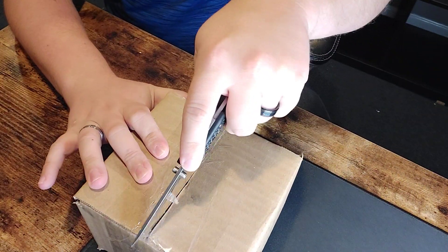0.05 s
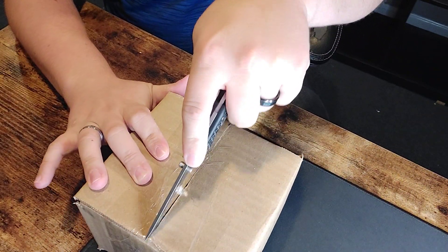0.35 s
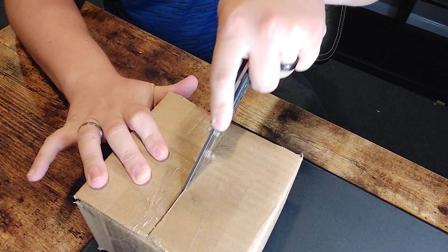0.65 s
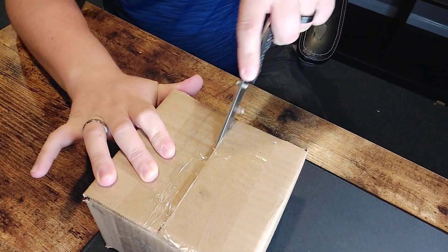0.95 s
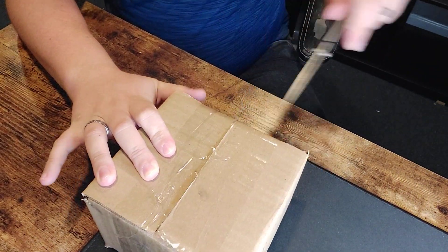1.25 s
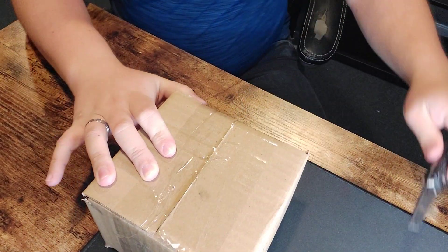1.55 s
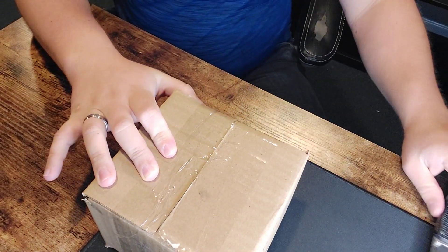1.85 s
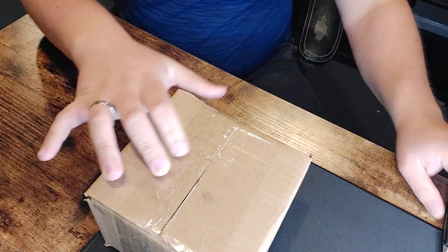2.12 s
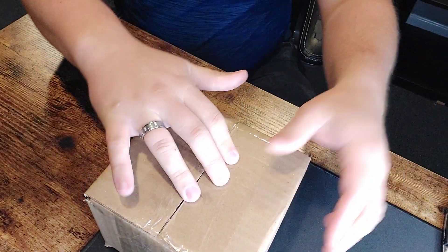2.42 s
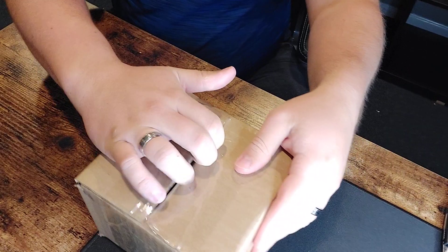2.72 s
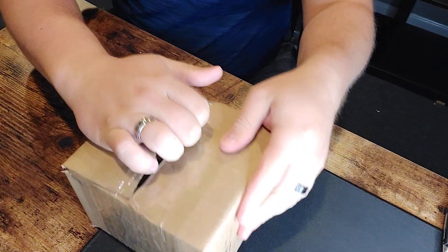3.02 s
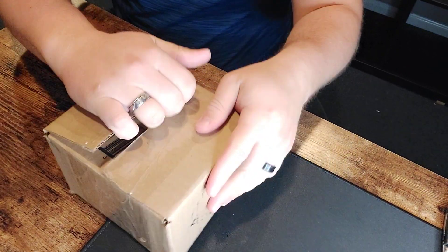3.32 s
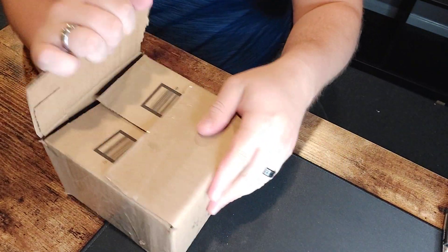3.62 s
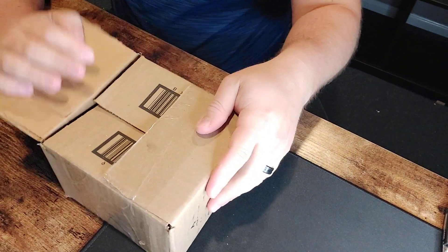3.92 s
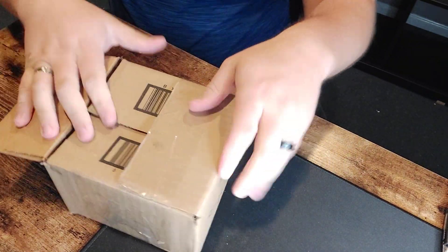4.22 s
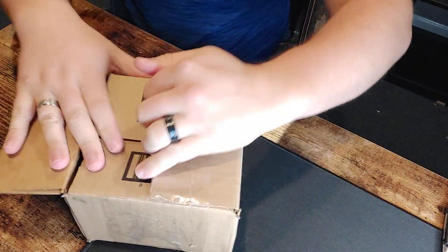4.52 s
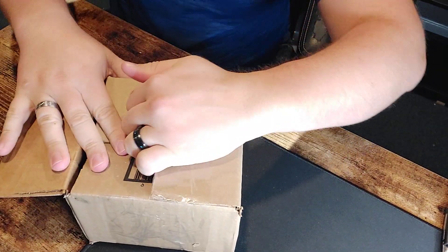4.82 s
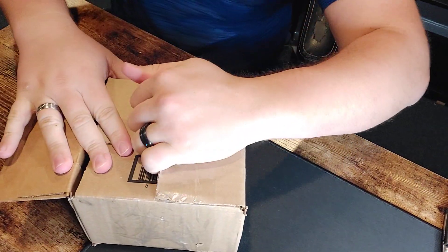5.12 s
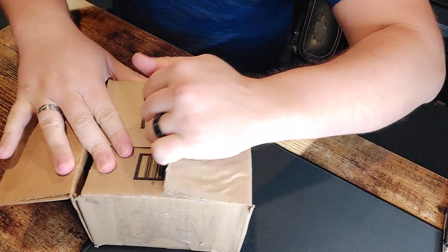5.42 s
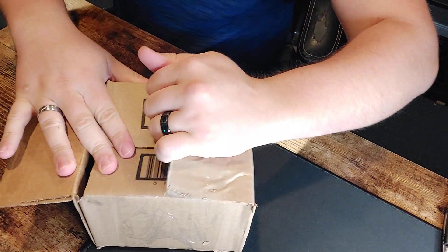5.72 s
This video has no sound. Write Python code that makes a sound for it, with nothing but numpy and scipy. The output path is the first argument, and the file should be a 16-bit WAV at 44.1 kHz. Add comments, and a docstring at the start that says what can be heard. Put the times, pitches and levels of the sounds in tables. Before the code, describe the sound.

Close scratchy slicing of packing tape, a knock on a desk, then cardboard flaps rubbing and popping open in a small room.

```python
"""A small cardboard box is cut open on a desk in a small room, close to a phone.
A knife punctures the packing tape, saws along the seam and is laid down, exciting the desk's modes.
Fingers slide over the lid, the last bits of tape snap, and the flaps scrape as they are pried up.
The scraping is stick-slip friction and the snaps are brief fractures; both set the hollow box ringing.
Short wall reflections and faint room air surround them."""
import sys
import numpy as np
from scipy import signal
from scipy.fft import rfft, irfft
from scipy.io import wavfile
from scipy.ndimage import uniform_filter1d

SR = 44100
rng = np.random.default_rng(int(sys.argv[2]) if len(sys.argv) > 2 else 0)


def materialize(psi):
    """Save the field psi as 16-bit PCM at rate SR to the path in sys.argv[1].

    A 1-D psi becomes a single channel; in a 2-D psi each row is a channel.
    """
    bounded = np.clip(np.atleast_2d(psi).T, -1, 1)
    quanta = np.round(bounded * 32767).astype(np.int16)
    wavfile.write(sys.argv[1], SR, quanta)


N = 262395
TIME = np.arange(N) / SR
RING_TIME = TIME[:SR // 2]


def undb(db):
    """Decibels to amplitude ratio."""
    return 10 ** (np.asarray(db) / 20)


def unit(x):
    """Normalisation to an rms of 1."""
    return x / np.sqrt(np.mean(x ** 2) + 1e-30)


def blow(x):
    """Normalisation of a transient to the energy of 20 ms at full level."""
    return x * np.sqrt(0.02 * SR / np.sum(x ** 2))


def along(points, hz):
    """Interpolation of (frequency, value) points on a log-frequency axis."""
    known_hz, value = np.transpose(points)
    return np.interp(np.log(hz + 1), np.log(known_hz), value)


def colour(x, spectrum, size=2048):
    """Minimum-phase filter: folding the cepstrum makes the (Hz, dB) response causal."""
    cepstrum = irfft(np.log(undb(along(spectrum, np.fft.rfftfreq(size, 1 / SR)))))
    cepstrum[1:size // 2] *= 2
    cepstrum[size // 2 + 1:] = 0
    return signal.fftconvolve(x, irfft(np.exp(rfft(cepstrum))))[:len(x)]


def cut(x, hz, kind, order=2):
    """Maximally flat low-, high- or band-pass filter."""
    return signal.sosfilt(signal.butter(order, hz, kind, fs=SR, output="sos"), x)


def resonate(x, hz, width_hz):
    """Second-order resonance with unit gain at its centre."""
    return signal.lfilter(*signal.iirpeak(hz, hz / width_hz, fs=SR), x)


def fade(t60_s):
    """Exponential decay, 60 dB in t60_s."""
    return np.exp(-np.log(1000) * RING_TIME / t60_s)


def mode(hz, t60_s):
    """Free vibration of one damped mode."""
    return np.sin(2 * np.pi * hz * RING_TIME) * fade(t60_s)


def add(out, start_s, sound):
    """Superposition of a sound from start_s onward."""
    start = int(start_s * SR)
    out[..., start:start + sound.shape[-1]] += sound[..., :N - start]


def diffuse(count):
    """Diffuse field: coherent at the two microphones in the bass, incoherent in the treble."""
    # frequency_hz, coherence
    likeness = [(100, 0.95), (300, 0.84), (600, 0.33), (1200, 0.12), (3000, 0), (12000, 0)]
    coherence = along(likeness, np.fft.rfftfreq(count, 1 / SR))
    mid, side = rfft(rng.standard_normal((2, count))) * np.sqrt([1 + coherence, 1 - coherence])
    return unit(irfft([mid + side, mid - side], count))


def air(level_db=-63.5):
    """Ambient noise: the room's faint, steady diffuse field."""
    # frequency_hz, gain_db
    spectrum = [(30, 7.5), (60, 4), (110, -7.5), (330, -14.5), (480, -4), (660, -11), (850, -22.5),
                (1500, -17.5), (2000, -32.5), (9000, -35.5), (15000, -28.5)]
    return undb(level_db) * unit(np.array([colour(side, spectrum) for side in diffuse(N)]))


def swell(start_s, rise_s, hold_s, fall_s, range_db=26, roundness=1.23):
    """Friction level follows sliding speed: the hand accelerates, holds and slows."""
    early = np.maximum(start_s + rise_s - TIME, 0) / rise_s
    late = np.maximum(TIME - start_s - rise_s - hold_s, 0) / fall_s
    return undb(-range_db * np.minimum(early + late, 4) ** roundness)


def friction(strokes, spectrum, slips_per_s, uneven_db, catch_db):
    """Stick-slip friction: fibres release dense, uneven impulses that shake the surface."""
    size = undb(uneven_db * np.minimum(rng.exponential(size=N), 5))
    slips = rng.standard_normal(N) * size * (rng.random(N) < slips_per_s / SR)
    slips *= undb(catch_db * unit(cut(rng.standard_normal(N), 110, "low")))  # slips come in clusters
    slips /= np.sqrt(uniform_filter1d(slips ** 2, size=1800) + 1e-9)  # steady power over about 40 ms
    surface = colour(slips, spectrum)
    rumble = unit(cut(surface, 250, "low", order=4))
    body = unit(cut(surface, [250, 2500], "band", order=4))
    hiss = unit(cut(surface, 2500, "high", order=4))
    return sum(undb(level_db) * swell(*timing) * (body + undb(hiss_db) * hiss + undb(rumble_db) * rumble)
               for *timing, level_db, hiss_db, rumble_db in strokes)


def blade_sawing():
    """Friction of steel on tape and card: the blade feels for the seam, then saws along it."""
    # start_s, rise_s, hold_s, fall_s, level_db, hiss_db, rumble_db
    strokes = [(0.07, 0.011, 0.047, 0.062, -70.5, -7, -12), (0.165, .015, .08, 0.22, -61.5, -8, -21.5),
               (0.35, 0.0047, 0.0071, 0.027, -51, -5.5, -8.5), (0.36, 0.027, 0.032, 0.028, -64, 1, -10.5),
               (0.436, 0.0089, .002, .005, -36, -4.5, -23), (0.52, 0.048, 0.12, 0.13, -43, -4, -15.5),
               (0.76, 0.01, 0.087, .1, -59, -1.5, -4), (0.82, 0.18, 0.021, 0.073, -36.5, -3, -13.5),
               (1.06, 0.058, 0.051, 0.015, -39, -1, -8), (1.285, 0.012, 0.024, 0.072, -64, 0, -18)]
    # frequency_hz, gain_db
    spectrum = [(60, -16), (140, -1.5), (330, -5.5), (470, 2), (750, -10.5), (1000, -12), (1250, -16.5),
                (1520, -11), (1900, -18.5), (2900, -19), (7500, -23.5), (9500, -28.5), (15000, -23)]
    return friction(strokes, spectrum, slips_per_s=8220, uneven_db=2.5, catch_db=2.0)


def crack(length_s, treble_db):
    """Fracture: a tear crosses tape or fibre in milliseconds and radiates a pitchless pulse."""
    # frequency_hz, gain_db
    spectrum = [(60, -24.5), (150, -15.5), (300, -4), (550, 5.5), (850, -8.5), (1200, -3.5), (1500, 1.5),
                (1950, -8), (2700, -1.5), (3700, -4.5), (6200, -2), (7900, -2), (9700, -5), (14500, -3)]
    envelope = np.exp(-(RING_TIME[:1024] / (2 * length_s)) ** 4)
    tear = rng.standard_normal(len(envelope))
    for _ in range(12):  # flatten the spectrum while keeping the pulse short
        tear = irfft(np.exp(1j * np.angle(rfft(tear * envelope))))
    tear = colour(np.pad(tear * envelope, (0, len(RING_TIME) - len(tear))), spectrum)
    body = signal.sosfiltfilt(signal.butter(2, 4000, fs=SR, output="sos"), tear, padlen=0)
    return blow(body) + undb(treble_db) * blow(tear - body)


def ticks(length_s=0.0009, slowing=0.2, lag_s_per_db=0.000015):
    """Small fractures all over the box: slower tears are duller; the nearer microphone hears first."""
    # start_s, level_db, treble_db, left_minus_right_db
    fractures = [(0.0922, -76.5, 6, -3), (0.3353, -74.5, 12.5, 1), (0.36, -57.5, 12.5, 3),
                 (0.9666, -38.5, -14, -4), (0.993, -32.5, -19, 10), (1.026, -36, -27, -7),
                 (1.135, -39, -2.5, -3.5), (1.1911, -38.5, -13, -2), (1.392, -64.5, 8, -2),
                 (2.347, -65.5, 2, 0.5), (2.487, -70, 6, 8), (2.5172, -38, -2.5, 4.5),
                 (2.5993, -35.5, 0, -2.5), (2.9645, -42.5, -0.5, 2.5), (3.0366, -52, 0.5, -1),
                 (3.046, -52, 3, 3.5), (3.323, -62, 5, 2.5), (3.365, -56, -6, 4.5),
                 (3.4225, -45.5, -4.5, 5.5), (3.5435, -58.5, 9.5, 3), (3.832, -64, 7, 4),
                 (4.024, -54, 8.5, 5.5), (4.971, -65, 3, -5.5), (5.022, -58.5, 8.5, -2),
                 (5.310, -46.5, -12, 9.5), (5.4084, -41, -7, 3.5), (5.8655, -56.5, 10, -12)]
    out = np.zeros((2, N))
    for start_s, level_db, treble_db, pan_db in fractures:
        tear = crack(length_s * undb(-slowing * treble_db), treble_db)
        add(out[0], start_s, undb(level_db + pan_db / 2) * tear)
        add(out[1], start_s + lag_s_per_db * pan_db, undb(level_db - pan_db / 2) * tear)
    return out


def tape_snaps(tape_width_hz=1000, splinters_per_s=2500, splinters_t60_s=0.067):
    """Release of tension: taut tape cracks, loose fibres crunch and the freed panel springs back."""
    # start_s, crack_db, treble_db, length_s, splinters_db, tape_hz, tape_db,
    # panel_db, panel_hz, panel_t60_s
    bursts = [(0.4461, -23.5, -5, 0.0012, -12, 3150, 0, -20.5, 312, 0.015),
              (0.4494, -28.5, -2, .0012, -17, 1116, -0.5, -19, 530, 0.053),
              (3.1021, -19, 1, 0.0019, -20, 2750, 0.5, -26, 210, 0.029),
              (3.5855, -19, -9.5, .0011, -12, 2130, -0.5, -28.5, 215, 0.016),
              (5.4617, -27, -2.5, 0.0012, -31, 13700, 10.5, -46, 450, 0.0073)]
    out = np.zeros(N)
    count = len(RING_TIME)
    for (start_s, crack_db, treble_db, length_s, splinters_db, tape_hz, tape_db,
         panel_db, panel_hz, panel_t60_s) in bursts:
        splinters = rng.standard_normal(count) * (rng.random(count) < splinters_per_s / SR)
        snap = crack(length_s, treble_db)
        crunch = signal.fftconvolve(snap, splinters * fade(splinters_t60_s))[:count]
        tear = blow(snap) + undb(splinters_db) * blow(crunch)
        tear = blow(tear + undb(tape_db) * resonate(tear, tape_hz, tape_width_hz))
        panel = blow(mode(panel_hz, panel_t60_s))
        add(out, start_s, undb(crack_db) * tear - undb(panel_db) * panel)
    return out


def thumps(crush_t60_s=0.066, crush_db=-6):
    """Impact on a damped panel: blade or finger excites one mode; the flutes crush with a dull noise."""
    # start_s, level_db, panel_hz, t60_s
    jolts = [(0.796, -45, 443, .022), (.994, -29, 697, 0.028), (1.027, -32.5, 563, 0.017),
             (1.153, -32, 227, 0.023), (1.19, -37.5, 180, 0.019), (2.076, -46.5, 142, .16),
             (2.207, -41, 161, 0.16), (2.52, -42.5, 247, 0.015), (2.601, -45, 308, 0.009),
             (2.965, -48.5, 550, 0.018), (3.104, -18, 360, 0.0063), (3.364, -45.5, 454, 0.034),
             (3.423, -37.5, 660, 0.018), (3.596, -22, 320, 0.042), (4.498, -49, 460, 0.05),
             (4.571, -43.5, 201, 0.03), (4.971, -41.5, 557, .02), (5.188, -46.5, 546, 0.033),
             (5.836, -40, 300, 0.02), (5.941, -35, 290, 0.035)]
    out = np.zeros(N)
    for start_s, level_db, panel_hz, t60_s in jolts:
        noise = rng.standard_normal(len(RING_TIME)) * fade(crush_t60_s)
        crush = blow(cut(noise, [panel_hz / 2, panel_hz * 2.46], "band", order=3))
        panel = blow(mode(panel_hz, t60_s))
        add(out, start_s, undb(level_db) * blow(panel + undb(crush_db) * crush))
    return out


def rasps(jitter_hz=170):
    """Near-periodic stick-slip: skin or steel rasps on card at a ragged pitch that follows its speed."""
    # start_s, length_s, level_db, first_hz, last_hz
    glides = [(0.891, 0.15, -38.5, 600.6, 752), (.975, 0.034, -40, 1420, 1610),
              (3.577, 0.0194, -22.5, 2298, 1420), (3.941, 0.15, -51, 715, 995),
              (4.152, 0.082, -49.5, 1020, 1183), (4.636, 0.045, -46, 1152, 1319),
              (4.683, 0.0534, -42, 1565, 1904), (4.762, 0.041, -45, 1205, 895),
              (4.811, 0.0454, -45, 1652, 1525), (4.918, 0.026, -49, 1480, 1180)]
    out = np.zeros(N)
    for start_s, length_s, level_db, first_hz, last_hz in glides:
        ragged = cut(rng.standard_normal((2, len(RING_TIME))), jitter_hz, "low")
        progress = np.minimum(RING_TIME / length_s, 1)
        phase = 2 * np.pi * np.cumsum(first_hz + (last_hz - first_hz) * progress) / SR
        rasp = unit(ragged[0] * np.cos(phase) + ragged[1] * np.sin(phase))
        add(out, start_s, undb(level_db) * np.sin(np.pi * progress) * rasp)
    return out


def desk_slide():
    """Sliding friction of hand and knife on the desk, mostly low in pitch."""
    # start_s, rise_s, hold_s, fall_s, level_db, hiss_db, rumble_db
    strokes = [(1.468, 0.003, 0.025, 0.31, -51, -17.5, -7), (1.71, 0.017, 0.011, 0.057, -64.5, -40.5, -6),
               (1.8, 0.037, .03, 0.22, -66.5, -31.5, -9), (2.06, 0.072, 0.031, .06, -61.5, -3, -5),
               (2.15, .03, 0.01, 0.018, -47.5, -8.5, -22.5), (2.28, 0.047, 0.035, 0.16, -62, -9, -5.5)]
    # frequency_hz, gain_db
    spectrum = [(60, -16), (200, -19.5), (340, -10.5), (450, -4), (650, -11), (920, -22.5), (1950, -28.5),
                (2400, -38), (4500, -38.5), (16000, -45.5)]
    return friction(strokes, spectrum, slips_per_s=8520, uneven_db=4.0, catch_db=3.5)


def knife_knocks(chatter_t60_s=0.051, modes_db=-9, click_db=-8):
    """Impact: the knife handle chatters and excites the desk's modes; softer contact is duller."""
    # start_s, level_db, cutoff_hz
    knocks = [(1.4735, -51.5, 697), (1.54, -57.5, 576), (2.169, -54, 913), (2.202, -26, 1800)]
    # pitch_hz, level_db, t60_s
    desk_modes = [(308.6, 5, 0.15), (396, -4, 0.11), (638, 9.5, 0.2), (739, 8.5, 0.14), (912, 9, 0.17),
                  (1080, -0.5, 0.22), (1540, -9, 0.17), (1930, -20, 0.22), (2266, -15, .2)]
    # frequency_hz, gain_db
    chatter_spectrum = [(60, -14), (160, -1), (260, -8), (400, 14), (650, -1.5), (900, 10), (1200, -15),
                        (1700, -1), (2200, -1.5), (4000, -17), (9000, -20), (16000, -3.5)]
    out = np.zeros(N)
    ring = blow(sum(undb(db) * mode(hz, t60_s) for hz, db, t60_s in desk_modes))
    for start_s, level_db, cutoff_hz in knocks:
        noise = rng.standard_normal(len(RING_TIME)) * fade(chatter_t60_s)
        chatter = blow(colour(noise, chatter_spectrum))
        click = crack(length_s=0.00099, treble_db=-9)
        knock = chatter + undb(modes_db) * ring + undb(click_db) * click
        add(out, start_s, undb(level_db) * blow(cut(knock, cutoff_hz, "low")))
    return out


def fingers_on_lid():
    """Friction of skin on card: fingers slide over the lid and dig into the seam."""
    # start_s, rise_s, hold_s, fall_s, level_db, hiss_db, rumble_db
    strokes = [(2.484, .004, 0.024, .02, -62.5, 0, 3.5), (2.517, 0.007, 0.034, 0.04, -46, 3.5, -4.5),
               (2.59, 0.012, 0.0079, 0.081, -42, 0.5, -21), (2.6, 0.18, 0.036, .2, -46, -0.5, -21.5),
               (2.83, 0.1, .05, 0.036, -45.5, -9.5, -9.5), (3.03, 0.0044, 0.059, 0.028, -48, -5.5, -12),
               (3.3, 0.016, .02, .05, -51, -4, -10), (3.358, 0.0056, 0.064, 0.025, -49, -7, 0),
               (3.45, 0.051, 0.035, .02, -55, -2.5, -14), (3.56, 0.036, 0.015, 0.06, -29.5, -1, -28)]
    # frequency_hz, gain_db
    spectrum = [(60, -5), (170, -5.5), (330, -10.5), (450, 1.5), (820, -13.5), (1510, -11.5), (2200, -22),
                (7900, -26), (10000, -29), (15000, -24.5)]
    return friction(strokes, spectrum, slips_per_s=13870, uneven_db=2.5, catch_db=3.0)


def first_flap():
    """Friction as the first flap folds back and the hands shift on the box."""
    # start_s, rise_s, hold_s, fall_s, level_db, hiss_db, rumble_db
    strokes = [(3.78, 0.0084, 0.037, 0.11, -61, 8.5, -10), (3.88, 0.15, 0.0071, 0.048, -47, -0.5, -7.5),
               (4.06, 0.11, 0.032, 0.067, -46.5, -1, -11.5), (4.2, 0.059, 0.052, 0.081, -47.5, 0.5, -1),
               (4.36, 0.018, 0.056, 0.11, -63, 9.5, -13), (4.493, 0.0068, 0.017, 0.069, -50.5, -3, -10),
               (4.515, 0.045, 0.0073, .07, -44.5, 2, -12), (4.6, 0.046, 0.051, 0.091, -41, -5.5, -12.5),
               (4.73, .06, .22, 0.16, -49.5, -3.5, -8), (5.1, 0.042, .02, .06, -67, 0.5, -11)]
    # frequency_hz, gain_db
    spectrum = [(60, -24.5), (170, -12.5), (320, -8.5), (450, 4.5), (820, -7), (1220, -8), (1510, -10),
                (2300, -15), (7900, -17), (9600, -19.5), (15000, -15)]
    return friction(strokes, spectrum, slips_per_s=12110, uneven_db=2.0, catch_db=3.0)


def second_flap():
    """Friction as the second flap is pried up."""
    # start_s, rise_s, hold_s, fall_s, level_db, hiss_db, rumble_db
    strokes = [(5.184, 0.0048, 0.0092, .04, -52, -12, -8), (5.2, 0.049, 0.046, 0.042, -54, -0.5, -10.5),
               (5.304, .012, 0.015, 0.12, -41, -4.5, -9), (5.34, 0.072, 0.12, 0.032, -37, -8, -14.5),
               (5.55, .05, 0.062, 0.032, -46.5, -9.5, -7.5), (5.725, 0.097, 0.011, 0.05, -35, -2, -12.5),
               (5.86, 0.058, .05, .03, -47.5, -14, -6)]
    # frequency_hz, gain_db
    spectrum = [(60, -31), (170, -11), (310, -6.5), (450, 1), (820, -9), (1470, -11), (2000, -16),
                (3500, -20), (7500, -22), (9700, -26), (15000, -22)]
    return friction(strokes, spectrum, slips_per_s=12150, uneven_db=2.5, catch_db=2.5)


def edge_skid(level_db=-37):
    """Forced resonance: a fast-sliding card edge hisses in three high bands."""
    # centre_hz, half_width_hz (of each of two filter stages), gain_db
    bands = [(5900, 690, 0), (6700, 1700, 15), (10460, 3200, 10)]
    noise = rng.standard_normal(N)
    hiss = sum(undb(gain_db) * resonate(resonate(noise, hz, 2 * half_width_hz), hz, 2 * half_width_hz)
               for hz, half_width_hz, gain_db in bands)
    return unit(hiss) * undb(level_db) * swell(start_s=5.865, rise_s=0.039, hold_s=0.024, fall_s=0.024)


def hollow_box(x, ring_db):
    """Modal response: the hollow box rings on after whatever shakes it."""
    # pitch_hz, level_db, t60_s
    box_modes = [(162, 5.5, 0.089), (314.5, 2, 0.3), (431, 3, 0.34), (455, -27, .14), (566.4, -2.5, 0.081),
                 (861, -9.5, .12), (2590, -5, .14), (2460, -10, .14)]
    ring = sum(undb(db) * np.cos(2 * np.pi * hz * RING_TIME) * fade(t60_s) for hz, db, t60_s in box_modes)
    return x + undb(ring_db) * signal.fftconvolve(x, ring[None] / np.linalg.norm(ring))[:, :N]


def room(x, wet_db, right_lag_s, t60_s=0.3, build_s=0.0014):
    """Reverberation: diffuse wall reflections build up and decay behind the direct sound."""
    # frequency_hz, gain_db
    wall_spectrum = [(140, -0.5), (330, -3), (550, -2.5), (1500, 0.5), (5000, 3), (14000, -0.5)]
    tail = diffuse(len(RING_TIME)) * fade(t60_s) * (1 - np.exp(-(RING_TIME / build_s) ** 2))
    tail = np.array([colour(side, wall_spectrum) for side in tail / np.linalg.norm(tail[0])])
    delay = np.exp(-2j * np.pi * np.fft.rfftfreq(N, 1 / SR) * right_lag_s)
    direct = np.array([x[0], irfft(rfft(x[1]) * delay, N)])
    reflections = signal.fftconvolve(x, tail, axes=1)[:, :N]
    return (direct + undb(wet_db) * reflections) / np.hypot(1, undb(wet_db))


def scene():
    """Superposition of friction, fractures and impacts over the air of the room."""
    stereo = np.ones((2, 1))
    rubbing = (blade_sawing() + desk_slide() + fingers_on_lid() + first_flap() + second_flap()
               + rasps() + edge_skid())
    mix = air()
    mix += room(hollow_box(stereo * rubbing, ring_db=-21.5), wet_db=-1.5, right_lag_s=15e-6)
    jolts = tape_snaps() + thumps()
    mix += room(hollow_box(stereo * jolts, ring_db=-34), wet_db=-4, right_lag_s=15e-6)
    mix += room(hollow_box(ticks(), ring_db=-32.5), wet_db=-6, right_lag_s=0)
    mix += room(stereo * knife_knocks(), wet_db=6, right_lag_s=-38e-6, t60_s=0.29)  # off to the right
    return mix


def record(dry, top_hz=15950):
    """The phone's response: thin bass, a narrow ring, a presence lift near 7.6 kHz, a steep top cut."""
    # frequency_hz, left_minus_right_db
    balance = [(100, 2), (500, 0.7), (1100, 2), (2200, 0), (4500, -0.5), (8000, 0.5), (13000, 2.5)]
    heard = cut(dry, 88, "high", order=3)
    ring = undb(5) * resonate(heard, 1514, width_hz=52)
    presence = undb(-5) * resonate(heard, 7590, width_hz=1100)
    heard = np.array([colour(side, [(hz, sign * db / 2) for hz, db in balance])
                      for side, sign in zip(heard + ring + presence, (1, -1))])
    top_cut = signal.ellip(10, 0.2, 70, top_hz, fs=SR, output="sos")
    return signal.sosfilt(top_cut, np.clip(heard, -1, 1))


dry = scene()
out = record(dry)
materialize(out)
```